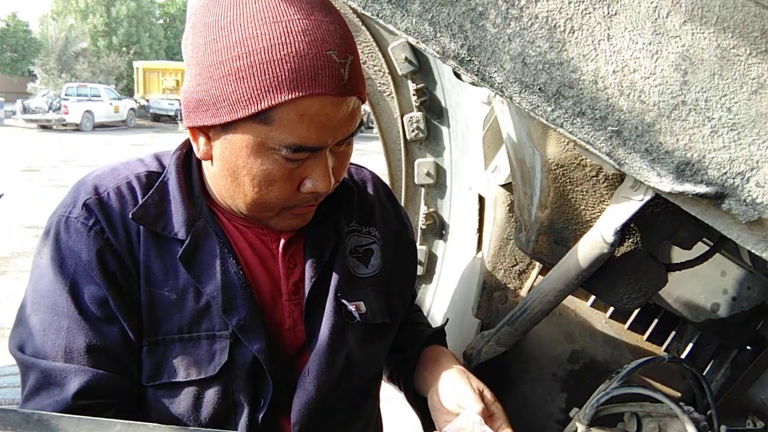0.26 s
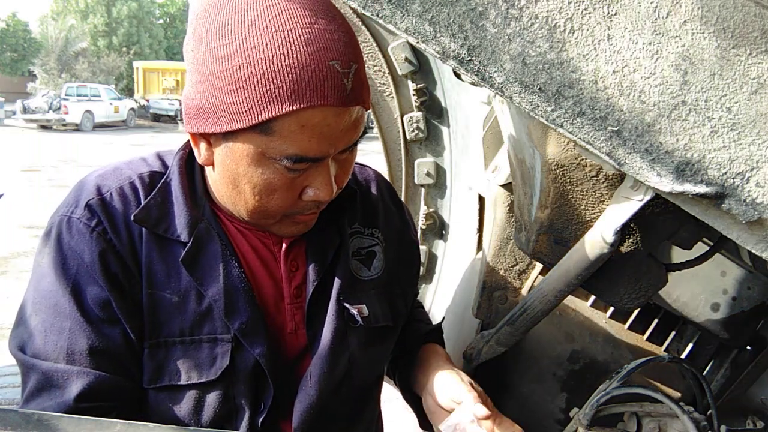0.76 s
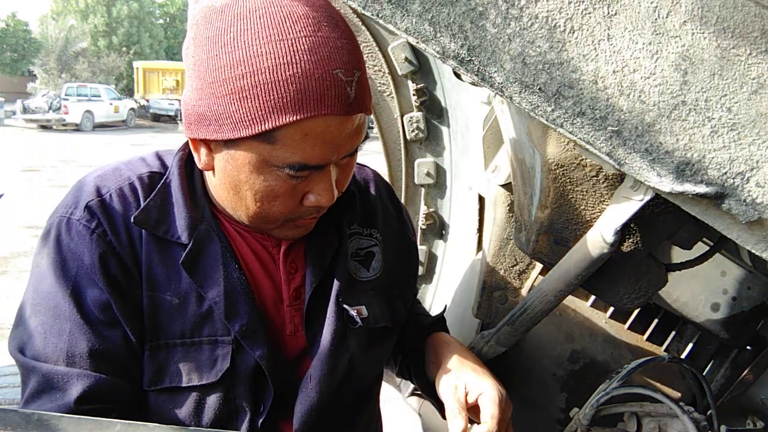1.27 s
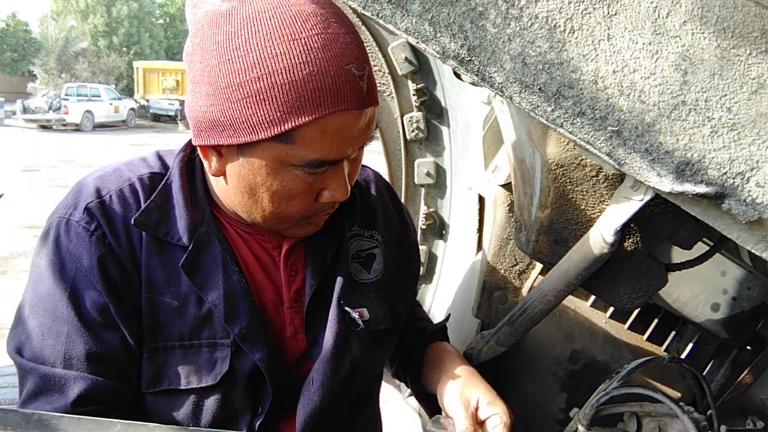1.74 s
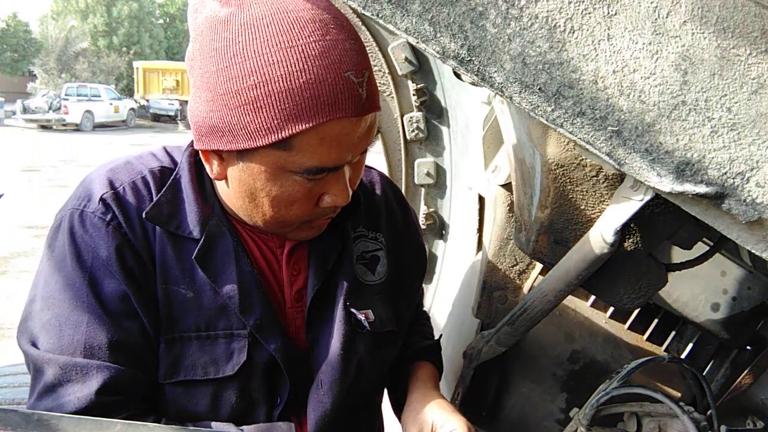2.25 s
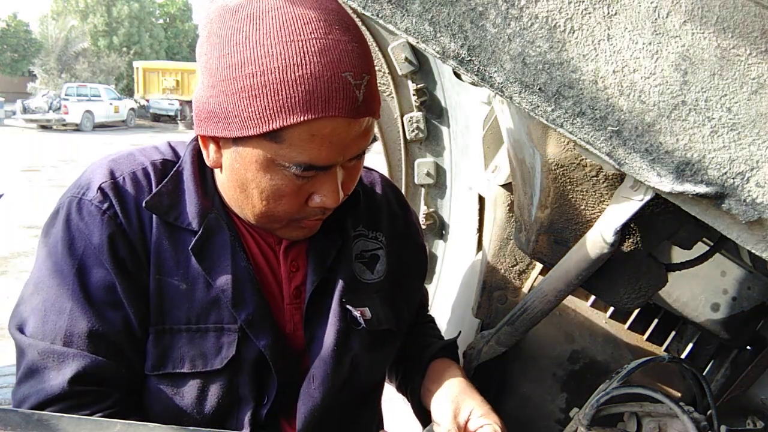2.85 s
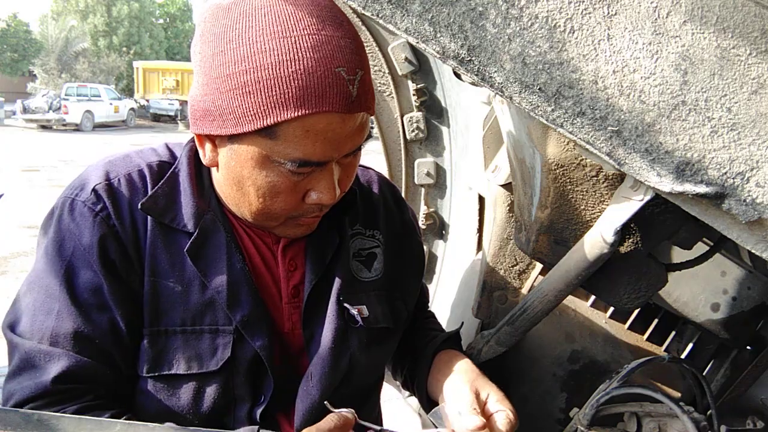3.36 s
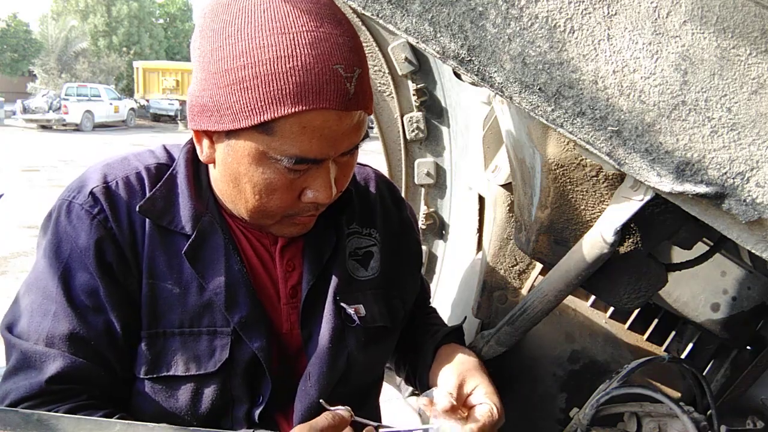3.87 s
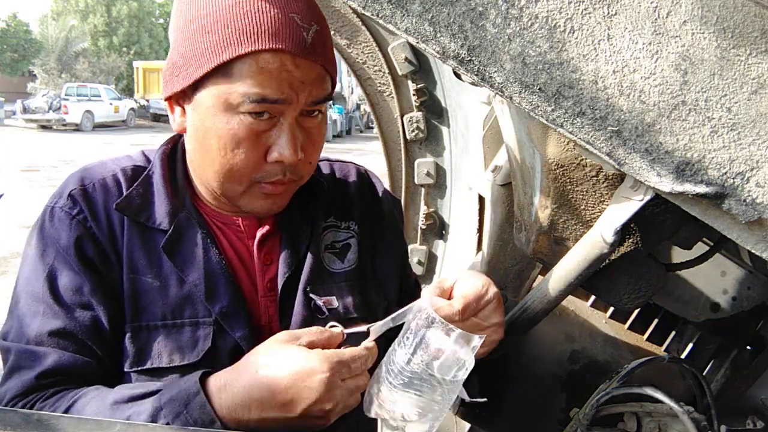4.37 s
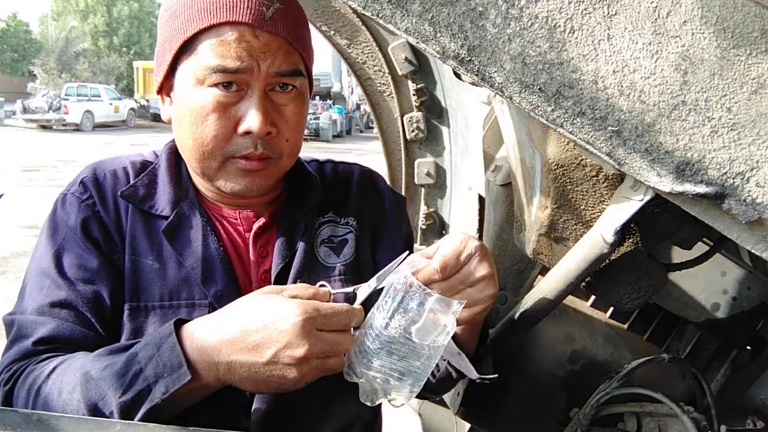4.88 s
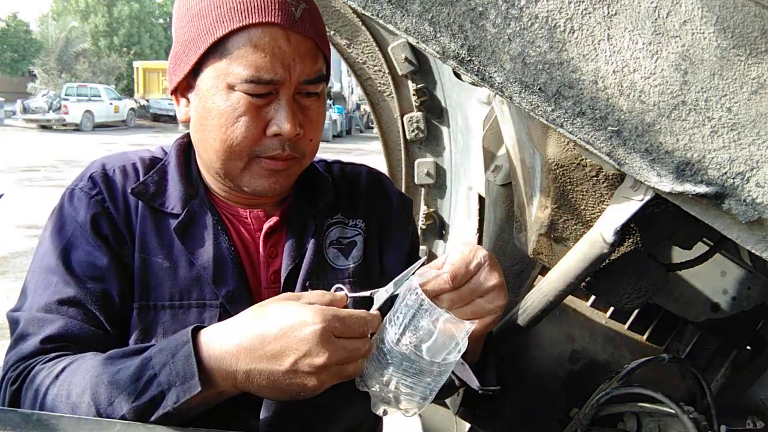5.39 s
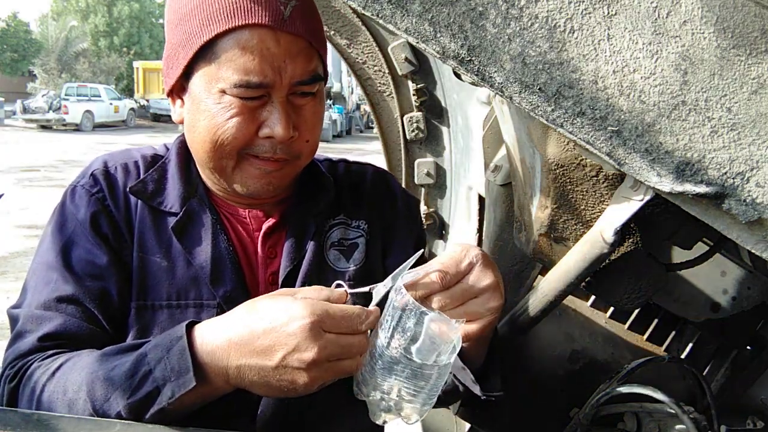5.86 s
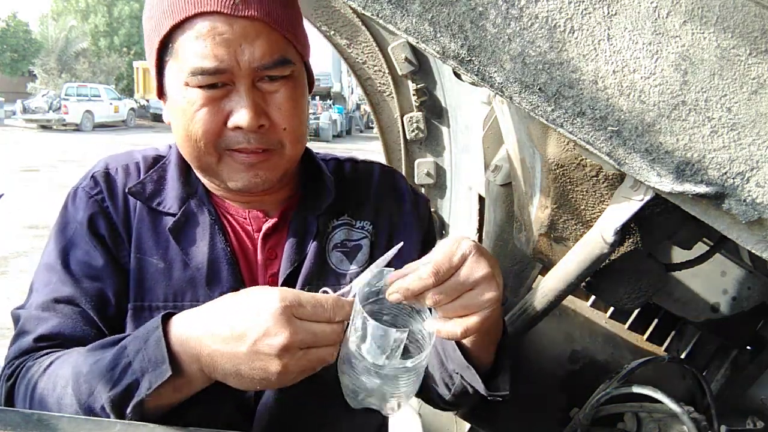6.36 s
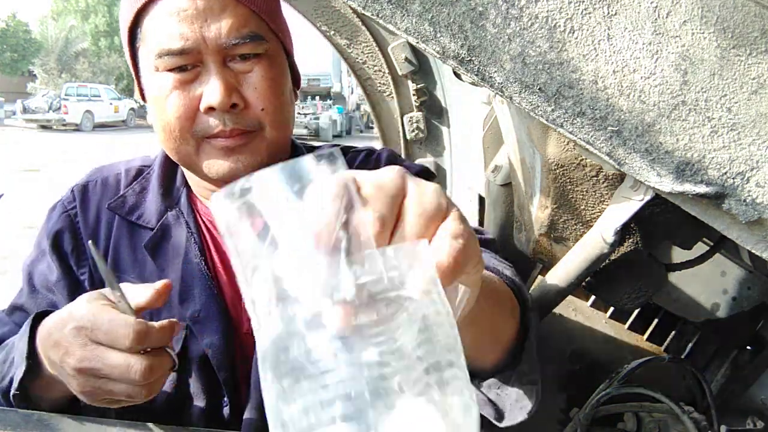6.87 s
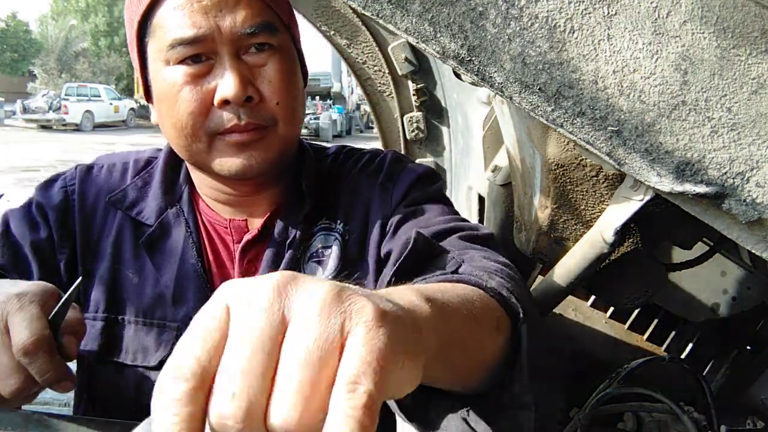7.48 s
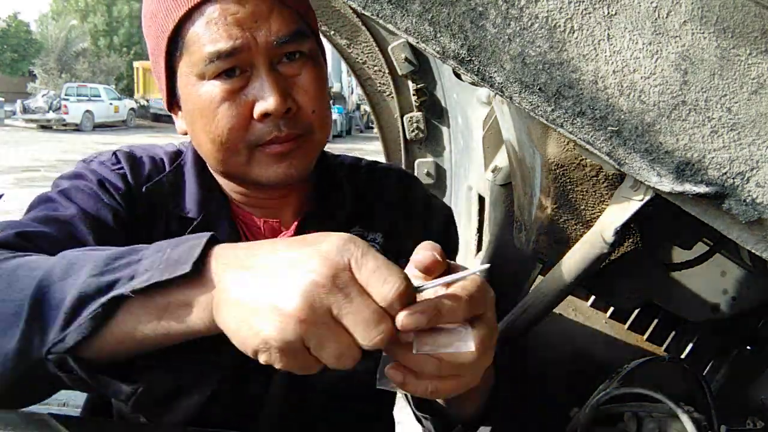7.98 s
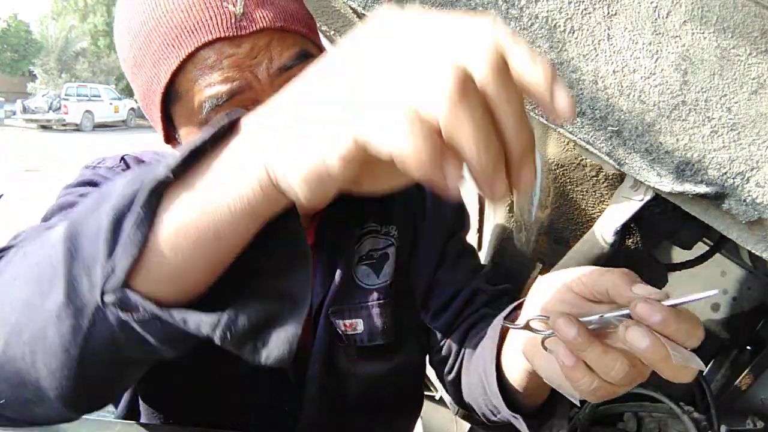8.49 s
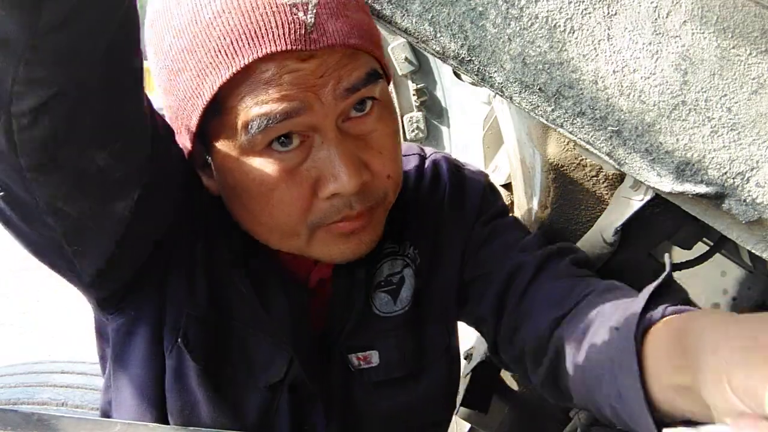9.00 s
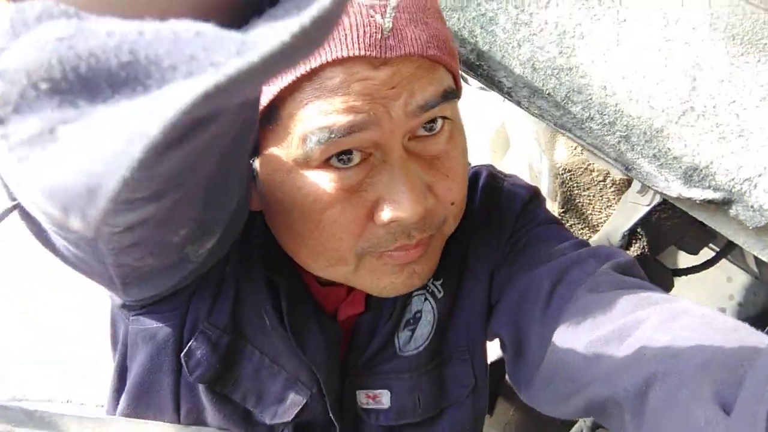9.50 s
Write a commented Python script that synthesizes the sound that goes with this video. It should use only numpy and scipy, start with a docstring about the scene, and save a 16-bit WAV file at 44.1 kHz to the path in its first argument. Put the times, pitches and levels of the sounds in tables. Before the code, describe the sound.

Dry, close microphone outdoors, with little echo. Fingers rub and flex thin plastic, which snaps hard near the start and again a few seconds later. Scissors rasp in short strokes and bite through with crunches, ending in a bright hollow pop. Then come a dull set-down, light metal clicks, cloth brushing and hard bright knocks, over low rumble and faintly pulsing machine hum.

```python
"""Scissors through a plastic bottle

Blades scrape and crunch (stick-slip grains through resonances) in an open workshop; the thin wall
snaps (noise bursts) and its hollow rings (decaying modes). The bottle is put down, scissors click from
hand to hand, then a sleeve brushes past (coloured grains) and something is grabbed with a clatter.
Distant machinery (noise, wavering tones) throbs faintly underneath, about seven swells a second."""
import sys
import numpy as np
from scipy import signal
from scipy.fft import rfft, irfft, next_fast_len
from scipy.io import wavfile
from scipy.ndimage import map_coordinates

SR = 44100
rng = np.random.default_rng(int(sys.argv[2]) if len(sys.argv) > 2 else 0)


def to_wav(sig):
    """Store sig (one row per channel, or 1-D mono) as 16-bit WAV at the path in sys.argv[1].

    Samples outside -1..1 are clipped; the rate is SR.
    """
    pcm = np.clip(np.atleast_2d(sig), -1, 1) * 32767
    pcm = np.round(pcm).astype(np.int16)
    wavfile.write(sys.argv[1], SR, pcm.T)  # frames by channels


N = 429534

# modes of the loose wall as it flexes: f/Hz, relative level/dB, t60/s
FLEX_MODES = [(1190, -9, .1), (1972, 1, .14), (2763, 2.5, 0.15), (3250, -5, 0.033), (4250, -3.5, 0.097)]


def amp(db):
    """Decibels to gain."""
    return 10 ** (np.asarray(db) / 20)


def unit(x):
    """x at rms 1."""
    return x / np.sqrt(np.mean(x ** 2) + 1e-20)


def along(points, hz):
    """(f/Hz, value) points interpolated on a log frequency axis."""
    f, v = np.transpose(points)
    return np.interp(np.log(hz + 1), np.log(f + 1), v)


def level(rows, column=1):
    """Gain per sample from a dB column against t/s in column 0; silent outside the rows."""
    cols = np.transpose(rows)
    return amp(np.interp(np.arange(N) / SR, cols[0], cols[column], left=-150, right=-150))


def wobble(rate_hz, size):
    """Smooth random curve of size samples, rate_hz knots a second."""
    knots = rng.standard_normal(int(size * rate_hz / SR) + 4)
    return map_coordinates(knots, [np.arange(size) * rate_hz / SR])


def filtered(x, response):
    """x times a response of frequency."""
    m = next_fast_len(len(x) + 8192)
    return irfft(rfft(x, m) * response(np.fft.rfftfreq(m, 1 / SR)), m)[:len(x)]


def coloured(x, spectrum, ripple_db=0, spacing_hz=130):
    """Minimum-phase filter to (f/Hz, dB) points; a random ripple stands for dense plate modes."""
    m = 2 * next_fast_len(len(x) // 2 + 4096)
    hz = np.fft.rfftfreq(m, 1 / SR)
    knots = rng.standard_normal(2000)
    ripple = np.interp(hz / spacing_hz, np.arange(len(knots)), knots)
    response_db = np.maximum(along(spectrum, hz), -110) + ripple_db * ripple
    # fold the cepstrum to make the response causal
    cepstrum = irfft(np.log(amp(response_db)))
    cepstrum[1:m // 2] *= 2
    cepstrum[m // 2 + 1:] = 0
    return irfft(rfft(x, m) * np.exp(rfft(cepstrum)), m)[:len(x)]


def resonate(x, peaks):
    """x through parallel (f/Hz, width/Hz, dB) resonances of alternating sign, at rms 1."""
    def response(f):
        total = 0
        for k, (centre, width, db) in enumerate(peaks):
            damping = 1j * f * width
            total = total + (-1) ** k * amp(db) * damping / (centre * centre - f * f + damping)
        return total
    return unit(filtered(x, response))


def grains(rate_hz, spread_db, smooth):
    """Tiny slips of uneven size over smooth friction noise, at rms 1."""
    at = rng.random(N) < rate_hz / SR
    sign = rng.choice([-1, 1], N)
    slips = at * sign * amp(spread_db * np.clip(rng.standard_normal(N), -2, 2))
    return unit(unit(slips) + smooth * rng.standard_normal(N))


def patchy(x, depth_db, width_hz, life_s):
    """x at rms 1, with patches that swell and fade across frequency and time."""
    hz, t, z = signal.stft(x, SR, nperseg=1024)
    field = rng.standard_normal((int(hz[-1] / width_hz) + 3, int(t[-1] / life_s) + 3))
    where = np.meshgrid(hz / width_hz, t / life_s, indexing="ij")
    gain_db = depth_db * map_coordinates(field, where, order=1)
    return unit(signal.istft(z * amp(gain_db), SR, nperseg=1024)[1][:N])


def ring(modes, attack_s):
    """(f/Hz, dB, t60/s) modes swell and die, with new strengths and slight detuning each blow."""
    t = np.arange(SR // 3) / SR
    total = 0
    for hz, db, t60 in modes:
        fade = amp(db + rng.normal(0, 1.5) - 60 * t / t60)
        cycles = hz * rng.normal(1, 0.0035) * t + rng.random()
        total = total + fade * np.sin(2 * np.pi * cycles)
    return -np.expm1(-t / attack_s) * total


def burst(t60_s, colour, ripple_db, crack, span_s, rise_s=0.00039):
    """A crack and its decaying dense noise ring; rms 1 over the first span_s."""
    t = np.arange(SR // 3) / SR
    decay = amp(-60 * t / max(t60_s, .005)) + crack * np.exp(-t / .0012)
    fade = decay * -np.expm1(-t / rise_s)
    y = coloured(rng.standard_normal(len(t)) * fade, colour, ripple_db, spacing_hz=228.5)
    return y / np.sqrt(np.mean(y[t < span_s] ** 2))


def add(track, s, sound):
    """Mix a sound in at time s."""
    part = track[round(s * SR):][:len(sound)]
    part += sound[:len(part)]


def strokes(rows, rise, t60_s):
    """Gain of (start, dB, length) strokes: each builds over the share rise of its length, holds, dies."""
    out, t = np.zeros(N), np.arange(SR) / SR
    for s, db, length_s in rows:
        attack = np.sin(np.pi / 2 * np.minimum(t / (rise * length_s), 1))
        add(out, s, attack * amp(db - 60 * np.maximum(t - length_s, 0) / t60_s))
    return out


def wavering(hz, drift, rough):
    """Tone of rms 1 whose pitch drifts slowly and trembles quickly, both as shares of hz."""
    pitch_hz = hz * (1 + drift * wobble(14, N) + rough * wobble(260, N))
    return unit(np.sin(2 * np.pi * np.cumsum(pitch_hz) / SR))


def bass(hz, spread):
    """Unsteady low boom of rms 1 with a weak octave, high-passed at 60 Hz."""
    phase = 2 * np.pi * np.cumsum(hz * (1 + spread * wobble(40, N))) / SR
    tone = np.sin(phase) + amp(-19) * np.sin(2 * phase)
    return unit(filtered(tone, lambda f: f ** 8 / (f ** 8 + 60. ** 8)))


def yard():
    """Distant machinery in open air: uneven rumble noise; a hum and higher tones that throb together."""
    # rumble and open-air spectra: f/Hz, level/dB
    rumble_colour = [(22, -19.5), (45, -8.5), (62, 1.5), (86, 0), (110, -8), (170, -18), (300, -27),
                     (500, -38), (900, -87)]
    air_colour = [(100, -11), (250, -0.5), (500, 0), (1500, -4), (3000, -14), (8000, -21), (11000, -32),
                  (15000, -34)]
    # hum noise resonances: f/Hz, width/Hz, level/dB
    hum_peaks = [(474, 70, -11), (578, 63, -11), (859.6, 24, -3.5)]
    # tone levels before the throb: t/s, lower tone/dB, upper tone/dB
    hum_level = [(0, -80, -87), (.8, -67, -85), (1.5, -85.5, -81.5), (2.6, -82.5, -78), (3, -93.5, -72),
                 (4.1, -90, -68.5), (4.7, -84.5, -74), (4.95, -73, -68.5), (6.1, -66.5, -64),
                 (6.8, -77.5, -77.5), (7.8, -100, -87), (8.7, -82.5, -77), (9.74, -98, -64.5)]
    whine_level = [(5.9, -90, -86.5), (6.2, -93.5, -72.5), (7.0, -94.5, -93.5), (7.6, -70, -89),
                   (8.3, -74, -67.5), (8.5, -95, -69.5), (9.74, -98, -66)]
    # nominal tones, lower and upper: f/Hz
    hum_tones = (615, 850)
    whine_tones = (1240, 1750)
    # throb rate: t/s, swells per second/Hz
    throb_rate = [(0, 6.75), (5.85, 6.75), (6.0, 7.49), (9.74, 7.49)]
    throb_peak_s, throb_swing_db = 5.93, 8  # time of one cosine top; swing either way
    rumble_db, air_db, murmur_db = -67, -78, 7  # murmur is relative to the upper hum tone

    rumble = unit(coloured(rng.standard_normal(N), rumble_colour) * amp(2.8 * wobble(10, N)))
    air = unit(coloured(rng.standard_normal(N), air_colour))
    turns = np.cumsum(np.interp(np.arange(N) / SR, *np.transpose(throb_rate))) / SR
    swell = np.cos(2 * np.pi * (turns - turns[round(throb_peak_s * SR)]))
    throb = unit(amp(throb_swing_db * swell + 3 * np.tanh(wobble(13, N))))

    band_colour = [(150, -16.5), (400, -7), (920, -1), (1150, -5.5), (4000, 2.5), (15000, -8)]
    band = coloured(rng.standard_normal(N), band_colour)
    resonant = resonate(resonate(band, hum_peaks), [(610, 160, -3), (860, 160, 0)])
    murmur = patchy(resonant, depth_db=4, width_hz=150, life_s=.045)
    hum = sum(level(hum_level, k + 1) * wavering(hz, drift=.03, rough=.055)
              for k, hz in enumerate(hum_tones))
    whine = sum(level(whine_level, k + 1) * wavering(hz, drift=.018, rough=.04)
                for k, hz in enumerate(whine_tones))
    machinery = hum + whine + amp(murmur_db) * level(hum_level, 2) * murmur
    return amp(rumble_db) * rumble + amp(air_db) * air + throb * machinery


def walls(x):
    """Faint diffuse answer: a noise tail whose decay depends on frequency, longest in the bass."""
    # decay: f/Hz, t60/s
    decay = [(100, 1), (700, 0.22), (4000, .32), (9000, .24), (16000, .2)]
    hz, t, z = signal.stft(rng.standard_normal(SR // 2), SR, nperseg=256)
    fade = amp(-60 * t / along(decay, hz)[:, None])
    tail = signal.istft(z * fade, SR, nperseg=256)[1]
    tail = tail * -np.expm1(-np.arange(len(tail)) / SR / 0.0028)
    return signal.fftconvolve(x, tail / np.linalg.norm(tail))[:N]


def thuds():
    """The body shifts: soft bumps swell and die in the bass."""
    # bumps: t at the peak/s, level/dB, half length/s
    bumps = [(0.674, -46.5, 0.02), (1.175, -35, 0.044), (1.806, -56, 0.071), (2.309, -48, 0.047),
             (2.436, -42.5, 0.032), (3.068, -45.5, 0.062), (3.199, -55, 0.052), (5.906, -51.5, 0.022),
             (6.288, -59.5, 0.02), (7.082, -50, .02), (7.24, -46, 0.056), (8.122, -55.5, 0.039),
             (8.336, -53.5, 0.085), (8.487, -55, 0.05), (8.74, -61, 0.2), (9.631, -44, 0.012)]
    t = np.arange(N) / SR
    swell = sum(amp(db) * np.exp(-((t - s) / half_s) ** 2) for s, db, half_s in bumps)
    return swell * bass(84, spread=0.16)


def scuffs_and_ticks():
    """Hands, scissors and dragged or grabbed things scuff softly (noise gusts); the wall ticks (bursts)."""
    # scuffs: t/s, level/dB, length/s, centre f/Hz
    scuffs = [(.05, -64.5, 0.054, 640), (0.167, -62.5, 0.071, 660), (0.203, -72, 0.075, 2370),
              (0.48, -59, 0.037, 2850), (0.71, -58.5, 0.025, 354), (.78, -66, 0.066, 600),
              (0.888, -61, 0.1, 2700), (1.261, -57.5, 0.026, 2600), (2.741, -66, 0.051, 1710),
              (3.668, -63.5, .018, 2200), (3.813, -66, 0.058, 4110), (4.142, -62, 0.094, 490),
              (4.145, -69, 0.043, 1630), (4.265, -59, .022, 590), (4.335, -55, 0.027, 565),
              (4.307, -73, 0.069, 1840), (4.497, -68, 0.051, 4300), (4.554, -71.5, 0.11, 1405),
              (5.601, -63, 0.016, 3570), (6.612, -57.5, 0.043, 1560), (7.214, -33.5, 0.029, 780),
              (7.426, -45, 0.046, 976), (7.744, -51, 0.061, 4460), (8.284, -64, 0.078, 2890),
              (8.724, -64, 0.13, 2660), (8.94, -80.5, .1, 2525), (9.202, -68, 0.054, 3300),
              (9.37, -45.5, 0.02, 485), (9.576, -54, 0.067, 280), (9.63, -55.5, 0.069, 173)]
    # ticks: t/s, level/dB
    ticks = [(1.506, -69.5), (1.924, -78.5), (1.98, -73), (2.52, -65), (3.111, -76), (3.186, -66.5),
             (3.672, -61), (5.117, -71.5), (6.176, -62.5), (6.205, -65), (6.246, -63.5), (6.642, -66),
             (6.808, -70)]
    out, t = np.zeros(N), np.arange(SR // 3) / SR
    for s, db, length_s, hz in scuffs:
        # quick start, slow release
        stroke = (1 - np.cos(2 * np.pi * np.minimum(t / (2 * length_s), 1) ** 0.38)) / 2
        slips = rng.standard_normal(len(t)) * amp(2.3 * wobble(280, len(t)))
        colour = [(hz / 4, -32), (hz * .75, -7), (hz * 1.1, 0), (hz * 1.6, -18), (hz * 6, -45)]
        y = coloured(slips * stroke, colour, ripple_db=5, spacing_hz=110)
        add(out, s, amp(db) * y / np.sqrt(np.mean(y[t < length_s] ** 2)))
    tick_colour = [(1500, -35), (4300, -6.5), (7500, 10.5), (9500, -17.5), (13000, -26.5)]
    for s, db in ticks:
        add(out, s, amp(db) * burst(.05, tick_colour, ripple_db=5, crack=.5, span_s=.03))
    return out


def handling():
    """Friction grains: fingers rub and flex the thin wall, the bottle drags, a sleeve brushes past."""
    # strokes of fingers, dragging bottle, sleeve: start t/s, level/dB, length/s
    rub_strokes = [(0, -54.5, 0.027), (.2, -62.5, 0.041), (.34, -65.5, 0.16), (.51, -63.5, .15),
                   (.7, -64, 0.085), (.82, -60, 0.3), (1.57, -64.5, 0.034), (1.67, -67.5, 0.072),
                   (1.93, -76, 0.052), (2.05, -71.5, 0.12), (2.35, -63.5, 0.2), (2.62, -76, 0.24),
                   (3.31, -69.5, 0.24), (3.67, -73, 0.06), (3.76, -65.5, .12), (3.99, -69.5, .15),
                   (4.25, -62, 0.057), (4.41, -64.5, 0.12), (4.73, -72, 0.16), (4.98, -63.5, 0.04),
                   (6.62, -69, 0.071), (6.75, -73.5, 0.18), (7.07, -61, 0.094), (7.62, -59.5, 0.19),
                   (7.88, -64, 0.12), (8.06, -70, 0.032), (8.15, -69.5, 0.19), (8.42, -69.5, 0.14),
                   (8.67, -58, 0.11), (9.07, -70, 0.032)]
    drag_strokes = [(7.2, -35, 0.078), (7.42, -46.5, 0.042), (7.485, -48, 0.033)]
    sleeve_strokes = [(9.3, -44, 0.13), (9.36, -39.5, 0.16), (9.59, -31.5, 0.018), (9.65, -59, 0.15)]
    # their spectra: f/Hz, level/dB
    rub_colour = [(1000, -20.5), (2000, -22), (3300, -33.5), (5200, -1), (7300, 7), (8500, -2),
                  (10000, -17), (12000, -32.5), (15000, -46)]
    drag_colour = [(70, -26), (220, -17), (390, 2.5), (550, -8), (830, -11), (1400, -18), (3000, -23.5),
                   (7000, -24), (11000, -37.5), (15000, -54.5)]
    cloth_colour = [(180, -32), (330, -10), (480, -3), (680, -18), (850, -3.5), (1200, -2.5), (2100, 0),
                    (2700, 6), (3800, -4.5), (7000, -9.5), (9500, -17), (15000, -50)]

    rubbing = coloured(grains(300, 4, smooth=.9), rub_colour, ripple_db=3)
    fingers = patchy(rubbing, depth_db=6.5, width_hz=220, life_s=.07)
    flex_colour = [(700, -36.5), (1200, -6.5), (2600, 3.5), (4500, 0.0), (6500, -16.0)]
    flexing = coloured(rng.standard_normal(N), flex_colour)
    creaks = resonate(grains(110, 4, smooth=.2), [(hz, 70, db) for hz, db, t60 in FLEX_MODES])
    # random patches make the crinkle's colour uneven and changing
    crinkle = patchy(unit(flexing) + creaks, depth_db=8, width_hz=140, life_s=.05)
    dragging = coloured(grains(600, 4.5, smooth=.55), drag_colour, ripple_db=3)
    drag = patchy(dragging, depth_db=4, width_hz=180, life_s=.04)
    brushing = coloured(grains(800, 4, smooth=.6), cloth_colour)
    cloth = patchy(brushing, depth_db=4.5, width_hz=160, life_s=.06)
    touch = amp(-0.5) * fingers + amp(-12.5) * crinkle
    return (strokes(rub_strokes, rise=0.48, t60_s=.3) * touch
            + strokes(drag_strokes, rise=1.0, t60_s=.27) * drag
            + strokes(sleeve_strokes, rise=0.38, t60_s=0.033) * cloth)


def clicks():
    """Small hard things click in the hands: short noise bursts without any hollow ring."""
    # t/s, level/dB, t60/s, then low, mid and treble against the 4 kHz region/dB
    contacts = [(7.779, -33.5, 0.085, -53, -7, -4.5), (8.064, -44.5, 0.19, -1, 4, 4.5),
                (8.142, -45, 0.075, -21, -9, 1), (8.164, -41.5, 0.069, -32, -4, 5.5),
                (8.2394, -48, 0.035, -29.5, -7, -15), (8.249, -36.5, 0.066, -15.5, -1, -1.5),
                (8.444, -58.5, 0.17, -11, 10.5, 14), (8.569, -55.5, 0.078, 5, 23, 21.5),
                (9.3103, -40, 0.012, -20.5, 7.5, -23), (9.345, -39.5, 0.058, -31, 0, -3.5),
                (9.42, -18, 0.021, -21.5, -7, -10), (9.479, -32, .09, -6, -11, -4),
                (9.492, -14, 0.036, -51, 0.5, -7.5), (9.496, -17, 0.033, -32, 3.5, -7.5),
                (9.529, -32, 0.011, 1, -6, 0.5), (9.5468, -22.5, 0.031, -11, 4, 7.5),
                (9.568, -39.5, 0.11, 24, 19, -6), (9.588, -40, 0.018, 17, 9, 11.5),
                (9.6057, -30, .027, -54, 4.5, -5)]
    top_db = -21  # 12 kHz against the treble
    out = np.zeros(N)
    for s, db, t60, low, mid, high in contacts:
        top = high + top_db
        colour = [(120, low - 14), (700, low), (1100, mid - 12), (1800, mid), (2700, mid + 2),
                  (4300, 0), (7500, high), (12000, top), (16000, top - 7)]
        add(out, s, amp(db) * burst(t60, colour, ripple_db=3.5, crack=1.5, span_s=.007))
    return out


def knocks():
    """The bottle lands on a ledge: a dull noise clack and a few low modes."""
    # t/s, level before trim/dB, t60/s, low, mid, high, top against the 4 kHz region/dB, lowest f/Hz
    blows = [(7.11, -30.5, 0.084, 32.5, 14, 0, -27, 414), (7.184, -41, 0.33, 21, 18, -2, -29, 400),
             (7.2003, -28, 0.113, 6.5, 3.5, -6.5, -32, 146), (7.357, -43.5, 0.23, -17, 4, -0.5, -22, 350.6),
             (7.4282, -26.5, 0.039, 8.5, -6, -8, -28.5, 173), (7.477, -37, 0.11, 22.5, 11.5, 0, -40, 172)]
    # modes of the ledge: f/Hz, relative level/dB, t60/s
    ledge_modes = [(273.7, 6, 0.045), (349, 1.5, 0.09), (433, -13, 0.26), (629, 2.5, 0.082),
                   (815, -8.5, 0.085)]
    trim_db = -1
    out = np.zeros(N)
    for s, db, t60, low, mid, high, top, lowest_hz in blows:
        colour = [(lowest_hz / 2, low - 18), (lowest_hz, low), (800, low), (1300, mid),
                  (2400, mid - 3), (4300, 0), (7500, high), (12000, top), (16000, top - 8)]
        gain = amp(db + trim_db)
        add(out, s, gain * burst(t60, colour, ripple_db=3.5, crack=.4, span_s=.012))
        excited = [mode for mode in ledge_modes if mode[0] > lowest_hz / 2 + 100]
        add(out, s, gain * ring(excited, attack_s=.002))
    return out


def jolt():
    """After a hard snap the bottle shudders: rattling grains over a low boom."""
    # rattle and boom strokes: start t/s, level/dB, length/s
    rattle_strokes = [(.944, -32.5, 0.12)]
    boom_strokes = [(0.977, -26.5, 0.074)]
    # rattle spectrum: f/Hz, level/dB
    shudder_colour = [(50, -13.5), (150, 4), (320, 1.5), (520, -1.5), (760, 2), (1100, -3), (2000, -14),
                      (3000, -11), (4500, -15), (7500, -17.5), (10000, -32), (15000, -47)]
    rattle = unit(coloured(grains(1000, 4.5, smooth=.6), shudder_colour, ripple_db=2.5))
    return (strokes(rattle_strokes, rise=0.27, t60_s=0.49) * rattle
            + strokes(boom_strokes, rise=.4, t60_s=0.62) * bass(84, spread=0.18))


def snaps():
    """The wall buckles with a bright crack, rings as it flexes and pumps the air inside the bottle."""
    # t/s, level/dB, mid and treble against the 4 kHz region/dB, hollow ring before trim/dB
    buckles = [(.102, -53.5, -4, -7, -55), (0.133, -41.5, 4, 9.5, -39), (.185, -48, 5, 7.5, -49),
               (.486, -46, -13, -2, -45), (.552, -55.5, -20, -3.5, -55), (0.748, -53, -24, 1, -56.5),
               (0.773, -50.5, -15, -6.5, -60), (.892, -52.5, -20, 4.5, -58), (.9412, -20.5, 1.5, 2.5, -35),
               (.944, -29, 6, -5, -24.5), (1.251, -49.5, -18, 1, -56.5), (2.353, -48.5, -4, -4.5, -55),
               (3.2708, -23.5, 6, 4.5, -46), (6.132, -45, -26.5, -4, -52), (6.299, -50.5, -29, 6, -61.5),
               (6.3468, -32, 8, 9.5, -47), (6.3496, -14, 2, 7.5, -18), (6.421, -27, 7, 0, -41.5)]
    # air in the bottle: f/Hz, relative level/dB, t60/s
    air_modes = [(619, 0, .075), (536, -12, .06), (733, -16, .06)]
    t60_s, hollow_trim_db = 0.05, 8.5
    # 12 kHz level, and its growth per dB of treble and of strength
    top_db, top_per_treble, top_per_force = -21, 2.3, .35
    flex_db, flex_growth = -58, .55  # ring after a snap with -45 dB in the mids; growth per dB
    out = np.zeros(N)
    for s, db, mid, high, hollow_db in buckles:
        top = min(top_db + top_per_treble * high + top_per_force * db, high - 13)
        colour = [(260, mid - 25), (520, mid - 3), (1250, mid - 13), (2000, mid - 1), (4300, 0),
                  (7500, high + 1), (9500, high - 5), (12000, top), (16000, top - 5)]
        add(out, s, amp(db) * burst(t60_s, colour, ripple_db=3.5, crack=.7, span_s=.007))
        flex_gain = amp(flex_db + flex_growth * (db + mid + 45))
        add(out, s, flex_gain * ring(FLEX_MODES, attack_s=.002))
        add(out, s, amp(hollow_db + hollow_trim_db) * ring(air_modes, attack_s=0.011))
    return out


def scissors():
    """Blades stick and slip along each other (ringing grains), then crunch through the wall."""
    # blades sliding, blades biting: start t/s, level/dB, length/s
    slide_strokes = [(5.12, -61.5, 0.098), (5.665, -52, 0.064), (6.09, -53.5, 0.042), (6.18, -70, 0.03)]
    cut_strokes = [(3.28, -58.5, .11), (5.412, -45.5, 0.07), (5.889, -39.5, 0.063)]
    # blade resonances: f/Hz, width/Hz, level/dB
    blade_peaks = [(3060, 70, -19), (4200, 200, 0), (4940, 120, -12), (6300, 200, -9), (6940, 200, -7),
                   (7850, 300, -8), (9900, 500, -16)]
    # bottle wall modes: f/Hz, width before hand damping/Hz, level/dB
    wall_modes = [(1565, 32, -4), (2290, 42, -22), (2760, 68, -0.5), (3214, 120, -2), (4050, 29, -4),
                  (4080, 21, 7), (4316, 16, -11.5), (4880, 88, 3.5), (5500, 55, -8), (6720, 44, -10),
                  (6930, 63, -7.5), (7700, 28, -22)]
    # tearing spectrum: f/Hz, level/dB
    tear_colour = [(800, -28.5), (1300, -23), (1620, -11.5), (2100, -17.5), (2900, 11), (3600, 1),
                   (4200, 5), (7500, 1.5), (11000, -13), (15500, -27)]

    # the edges catch about forty times a second
    catch_hz = 42 + 9 * wobble(20, N)
    catches = amp(4 * np.sin(2 * np.pi * np.cumsum(catch_hz) / SR))
    chatter = catches * grains(900, 4, smooth=.7)
    # the ring shifts as the contact travels
    squeal = patchy(resonate(chatter, blade_peaks), depth_db=4, width_hz=200, life_s=.08)
    song = unit(catches * wavering(4200, drift=.025, rough=.03))  # main blade mode
    squeal = unit(squeal + amp(-1.5) * song)

    tearing = grains(1200, 3, smooth=.7)
    crunch = unit(coloured(tearing, tear_colour, ripple_db=3))
    # the gripping hand damps every mode
    wall = resonate(tearing, [(hz, width + 45, db) for hz, width, db in wall_modes])
    hollow = resonate(tearing, [(622, 860, 0)])
    hollow = resonate(hollow, [(500, 60, -10.5), (625, 14, 5.0), (859, 27.46, -10.0)])
    bite = amp(-4.5) * crunch + amp(-4) * wall + amp(-4.5) * hollow
    return (strokes(slide_strokes, rise=0.94, t60_s=0.251) * squeal
            + strokes(cut_strokes, rise=0.25, t60_s=0.074) * bite)


def scene():
    """All the close sounds, the echo of hits and rubs, the thuds and the yard."""
    hits = snaps() + knocks() + clicks()
    rubs = scissors() + jolt() + handling() + scuffs_and_ticks()
    echo = amp(-17.0) * walls(hits) + amp(-12.5) * walls(rubs)
    return (hits + rubs + echo + thuds() + yard())[None]


def record(dry):
    """Band limit: nothing from 16 kHz up."""
    return filtered(dry[0], lambda hz: hz < 16000)[None]


dry = scene()
out = record(dry)
to_wav(out)
```